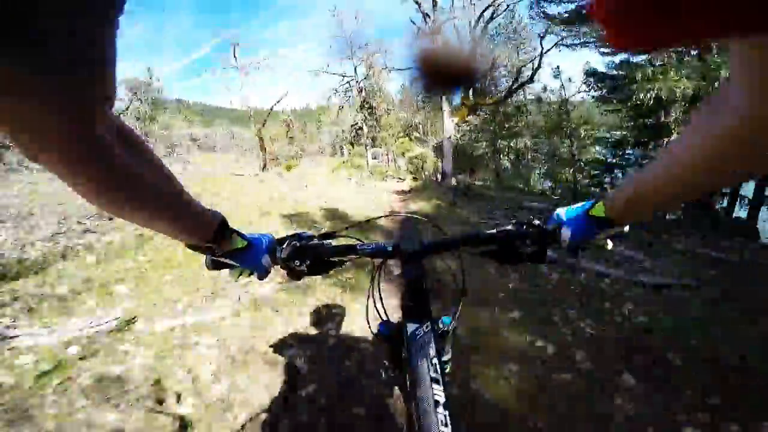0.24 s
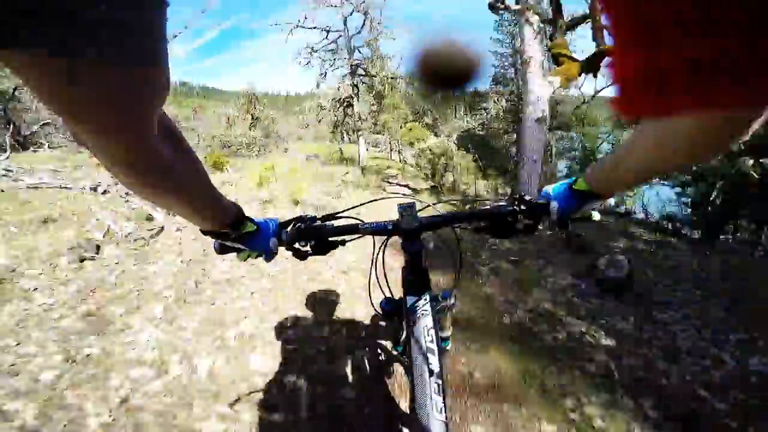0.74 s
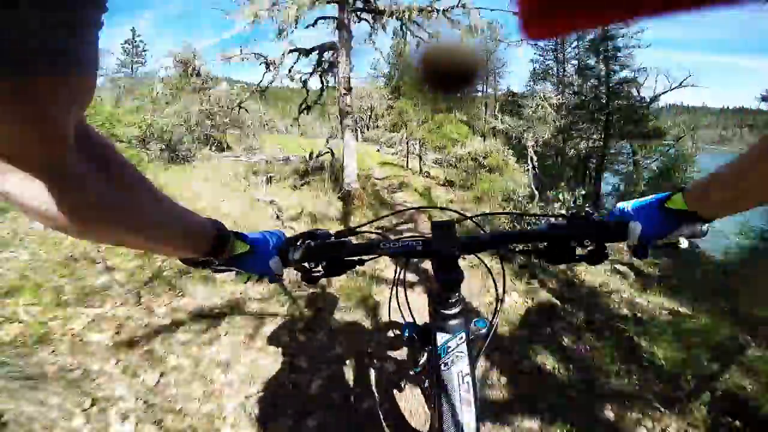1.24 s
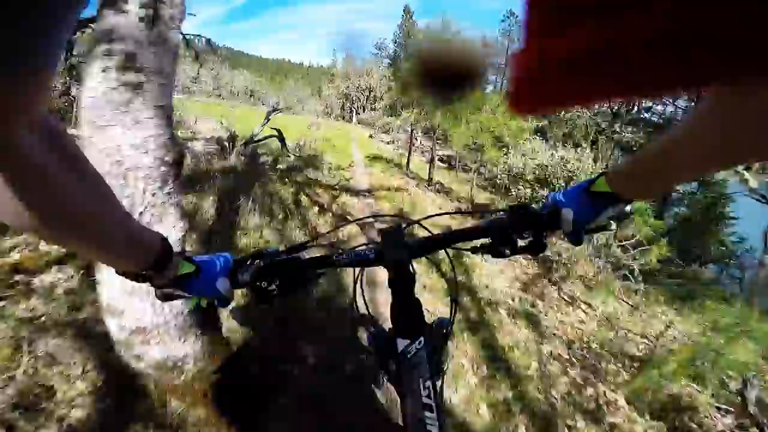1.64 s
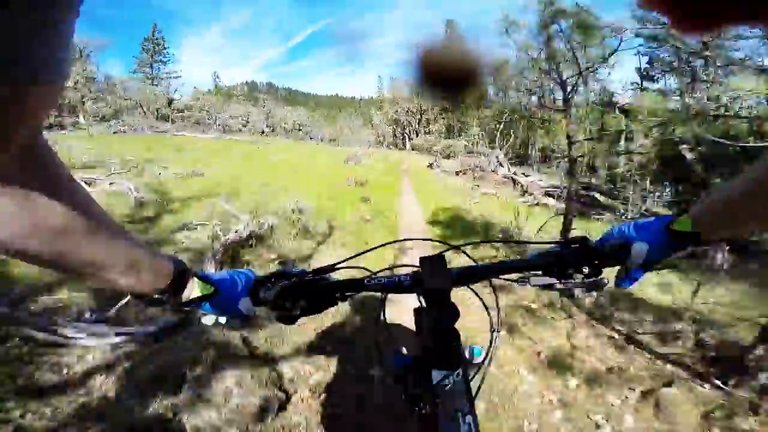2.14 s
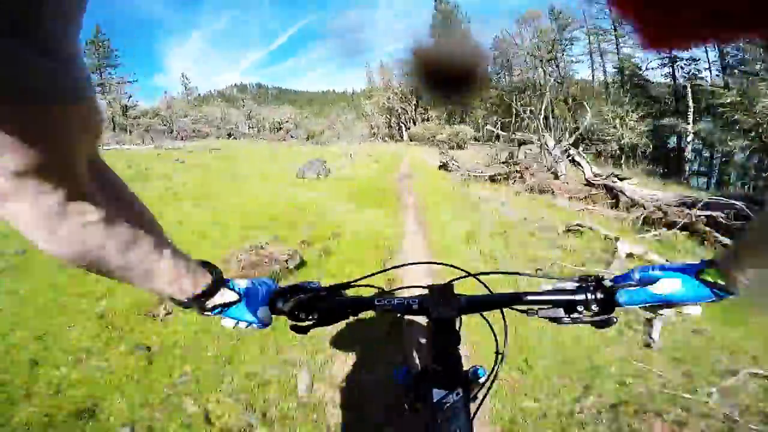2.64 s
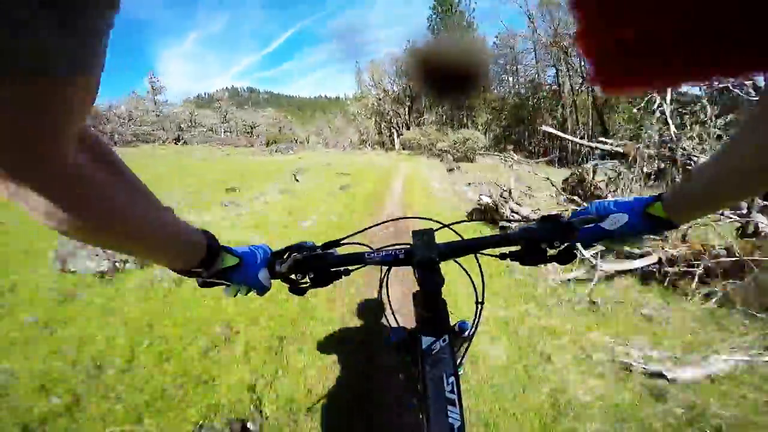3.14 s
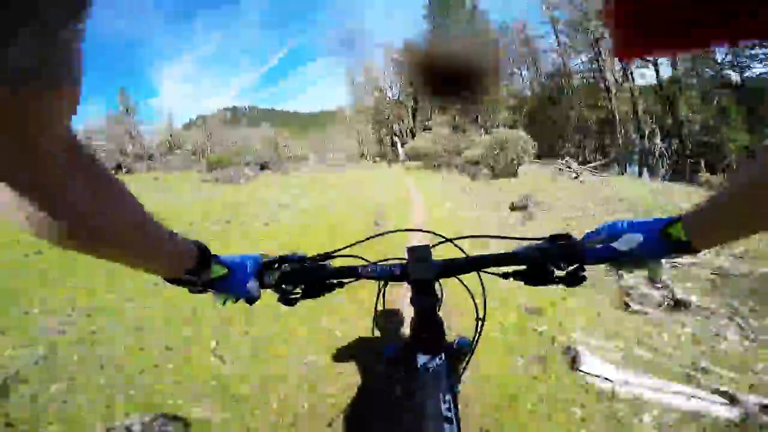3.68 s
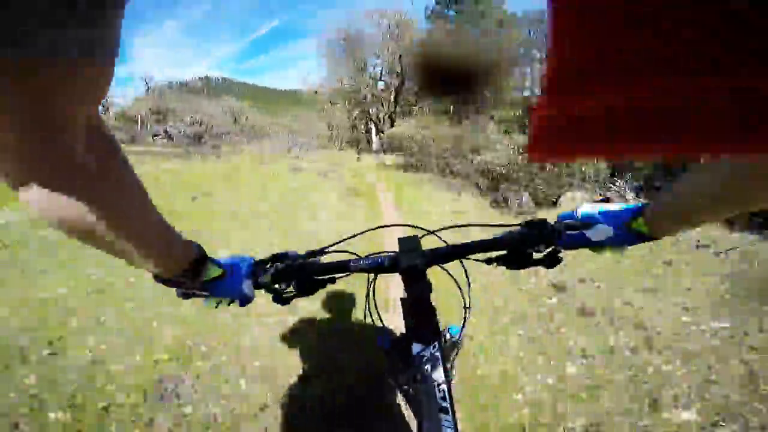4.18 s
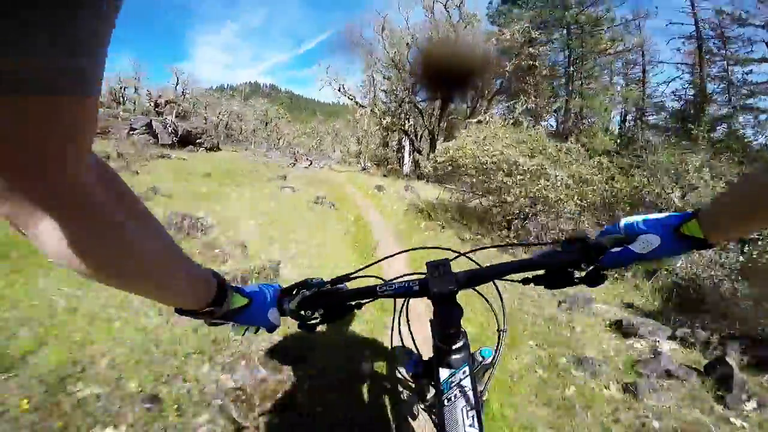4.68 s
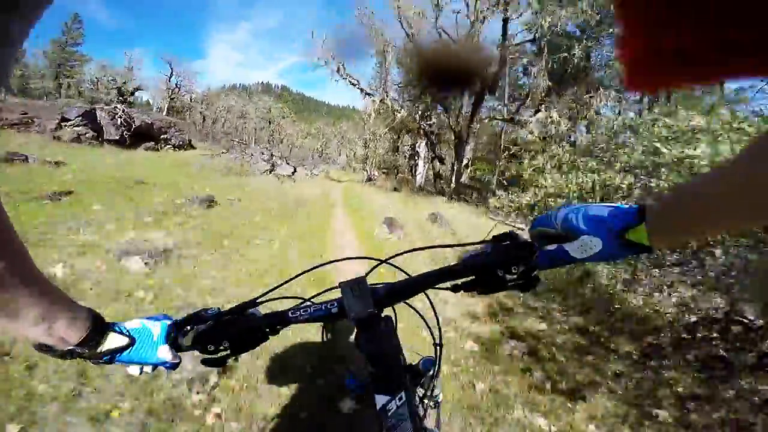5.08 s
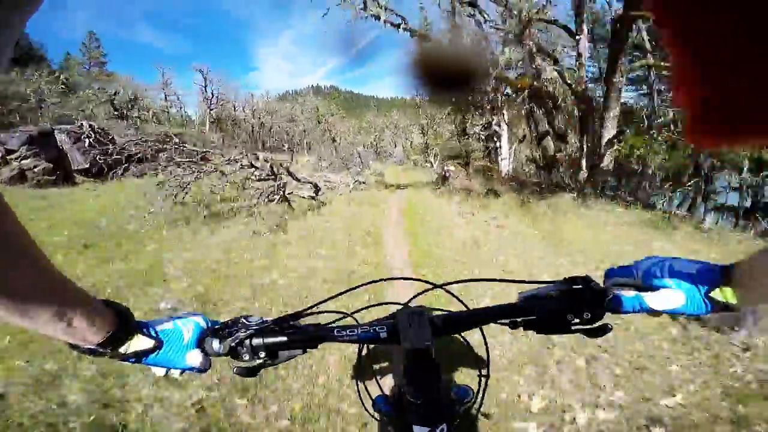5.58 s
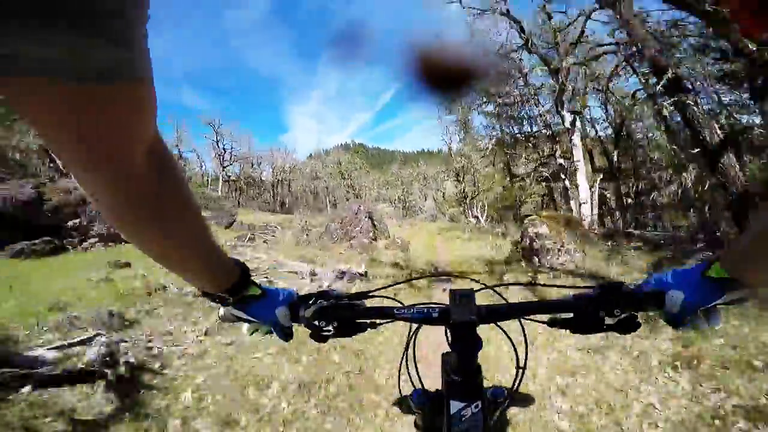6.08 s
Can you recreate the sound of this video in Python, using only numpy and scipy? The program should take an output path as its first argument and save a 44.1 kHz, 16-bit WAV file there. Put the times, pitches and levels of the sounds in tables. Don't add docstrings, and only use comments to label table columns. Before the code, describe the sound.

A mountain bike rushes over dry leaves and twigs, plastic camera mount knocking hard, wind buffeting the case, then smoother rolling with light taps.

```python
import sys
import numpy as np
from scipy import signal
from scipy.fft import rfft, irfft
from scipy.io import wavfile
from scipy.ndimage import uniform_filter1d

SR = 44100
rng = np.random.default_rng(int(sys.argv[2]) if len(sys.argv) > 2 else 0)


def output_pcm(signal):
    pcm = np.clip(np.atleast_2d(signal).T, -1, 1) * 32767
    wavfile.write(sys.argv[1], SR, np.round(pcm).astype(np.int16))


def gain_from_db(level_db):
    decades = np.asarray(level_db, float) / 20
    return 10 ** decades


N = 278712
T = np.arange(N) / SR

# frequency [Hz], density [dB per Hz].
GROUND_COLOUR = [(88, -14.5), (150, -17.5), (205, -5), (244, -0.5), (524, 0), (837, -11), (960, -7.5),
                 (1360, -14), (2270, -9), (3840, -8), (5050, -23), (6020, -22), (8560, -32), (15200, -32),
                 (15550, -57.5)]
# frequency [Hz], width [Hz], lift [dB].
CASE_MODES = [(330, 111, 6), (979, 42, 2.5), (1750, 36.6, -18), (2280, 70.6, 5.5), (3157, 364, -0.5),
              (3973, 94.4, -4), (4610, 93, 8), (6100, 910, 2), (7198, 210, 8), (9726, 277, 7.5)]
# frequency [Hz], level [dB].
WHINE_TONES = [(12618, -81)]
# time [s], level [dB].
WIND_LEVEL = [(0, -41.5), (.3, -27.5), (.7, -22.5), (1.5, -24), (2.2, -27), (2.65, -29), (3.1, -34.5),
              (3.5, -41.5), (4, -30.5), (4.6, -36), (5.05, -37), (5.35, -34), (5.9, -36), (6.32, -32.5)]
# start [s], hold [s], level [dB], edge [s].
WALL_HEAVES = [(0, 0.013, -23, 0.0098), (0.146, 0.043, -21.5, 0.0326), (0.419, 0.067, -21.5, 0.041),
               (0.932, 0.0127, -22, 0.0205), (1.104, 0.195, -17.5, 0.031), (1.668, 0.0157, -17.5, 0.047),
               (1.896, 0.0212, -16.5, 0.0141), (2.067, 0.036, -24.5, 0.0215), (2.727, 0.1725, -13, 0.0043),
               (2.966, 0.0116, -28, 0.05), (3.228, 0.0207, -26, 0.0226), (3.576, 0.0112, -24.5, 0.0198),
               (3.753, .02, -32.5, 0.029), (4.107, 0.0133, -22, 0.0175), (4.355, 0.025, -26.5, 0.0262),
               (4.57, 0.0204, -34, 0.0215), (4.759, 0.185, -24, 0.034), (5.166, 0.035, -22.5, 0.0314),
               (5.579, 0.0234, -31, 0.019), (6.021, 0.0071, -28, 0.0244), (6.312, .02, -30.5, 0.064)]
# time [s], level [dB].
WIND_PUFFS = [(0, -26), (.14, -37), (.35, -39.5), (.54, -37), (.9, -49.5), (1.04, -47.5), (1.32, -32.5),
              (1.99, -45.5), (2.69, -42.5), (2.85, -27.5), (2.94, -33), (3.24, -41.5), (3.41, -37),
              (3.55, -33), (3.75, -34.5), (4.49, -33), (4.79, -42), (5.56, -51), (5.93, -33.5),
              (6.3, -45.5)]
# time [s], peak [dB], pitch [Hz].
ROOT_JOLTS = [(0.117, -15, 57.6), (0.341, -19.5, 65.4), (.495, -15, 68.6), (.885, -15, 62),
              (1.659, -16, 72.4), (2.728, -14.5, 77.6), (2.844, -15.5, 80), (3.58, -18, 54.7),
              (3.992, -22, 69.3), (4.769, -20, 81.8), (5.169, -22, 69.9)]
# time [s], level [dB].
ROUGHNESS = [(0, 5), (.19, 1), (.46, 4.5), (.65, -0.5), (1.05, -0.5), (1.28, 2.5), (1.6, 1), (2.08, 0.5),
             (3.08, 1.5), (3.3, -4.5), (3.64, -2.5), (4.1, -2), (4.7, 0), (4.96, -3.5), (5.54, -6),
             (5.8, -4.5), (6.16, -2), (6.32, -5.5)]
# time [s], level [dB].
LITTER_DEPTH = [(0, -1), (.19, 0.5), (.46, 3), (.63, -1.5), (1.05, 2.5), (1.28, 4.5), (1.51, 0), (2.53, 4),
                (3.27, 2), (3.52, -1), (3.64, 2.5), (4.1, -3), (4.7, 0), (4.96, -7), (5.54, -7.5),
                (5.72, 1.5), (5.88, 2.5), (6.32, -2.5)]
# start [s], end [s], lift [dB].
LEAF_DRIFTS = [(4.284, 4.448, 3.5), (4.696, 4.814, 6.5), (0.173, 0.352, 2.5), (0.73, .82, 0),
               (5.44, 5.6, 3.5), (5.615, 5.7, 2.5), (.66, 0.677, 1.5), (2, 2.1, 3.5), (2.36, 2.56, 1.5),
               (2.7, 2.9, 1.5), (1.274, 1.252, 1), (5.93, 6.09, 0)]
# start [s], end [s], lift [dB].
STRAW_PATCHES = [(1.18, 1.68, 3.5), (2.75, 2.95, 2.5), (3.2, 3.75, 3.5), (4.85, 5.4, 3.5)]
# time [s], peak [dB], pitch
# [Hz].
GRIT_TICKS = [(.0797, -53, 5670), (.1416, -39, 5690), (.2034, -43, 5510), (.3097, -42, 6220),
              (.5678, -22, 5550), (.5855, -50, 6000), (1.2371, -46, 5200), (1.283, -49.5, 5240),
              (1.4222, -43, 5600), (1.4511, -39.5, 5590), (1.5968, -41, 5900), (1.6332, -41, 6000),
              (1.9021, -43, 5860), (4.735, -35, 6000), (4.755, -39, 5980), (0.288, -37.5, 5800),
              (0.5062, -39, 5860), (0.6175, -43, 5880), (1.3049, -40.5, 5950), (1.3503, -38.5, 5970),
              (1.3768, -44.5, 6100), (1.399, -41, 6000), (1.8781, -38.5, 6380), (2.5002, -49, 5500),
              (2.6893, -40.5, 5950)]
# time [s], peak [dB], pitch [Hz].
STRAW_SIZZLES = [(1.6267, -45, 9570), (2.6409, -33.5, 11450), (2.8938, -51, 8500), (2.913, -44.5, 9600),
                 (2.9662, -43.5, 8250), (3.0649, -38, 9140), (4.593, -47.5, 8020), (.568, -34.5, 13040),
                 (.576, -47.5, 8600), (4.478, -51.5, 12000), (.62, -55.5, 11500)]
# start [s], length [s], level [dB].
STALK_SCRAPES = [(4.732, 0.0066, -39), (4.7532, 0.0044, -40)]
# time [s], low ring [dB], high ring [dB].
METAL_RINGS = [(0.57, -30, -44), (0.823, -30.5, -38), (1.025, -36, -46.5), (1.138, -31, -54.5),
               (2.286, -39.5, -31), (2.737, -37, -34.5), (2.877, -41, -37), (2.929, -44, -50),
               (3.533, -41.5, -40), (5.889, -44, -52), (6.187, -42, -46.5)]
# frequency [Hz], split of the pair [Hz], T60 [s].
METAL_MODES = [
    (1808, 15, .19),
    (2654, 22, .13),
]
# time [s], peak [dB], pitch [Hz].
DEEP_THUDS = [(.568, -22, 381), (0.819, -20.5, 317.5), (2.007, -29, 330), (2.727, -25.5, 313),
              (2.86, -13.5, 268), (2.875, -24.5, 317), (3.5317, -32, 394), (4.113, -32.5, 276),
              (2.2866, -54.5, 344), (5.891, -32.5, 330), (6.188, -33.5, 294), (2.979, -29.5, 196)]
# time [s], peak [dB], pitch [Hz], hollow [dB], crack [dB].
MOUNT_KNOCKS = [(0.0328, -17, 2038, -1.5, -14), (0.5682, -3.5, 2059, -3, -24),
                (0.8175, -6, 2052, -4, -27.5), (0.8927, -16, 2025, -2, -19.5),
                (1.02, -15.5, 2290, -4.5, -18.5), (1.1389, 1.5, 2280, -12.5, -30.5),
                (2.0057, -24, 2250, 5, -12.5), (2.2862, -4, 2260, -11.5, -37),
                (2.4254, -13.5, 2092, -5, -15), (2.5689, -20, 2280, 1.5, -10.5),
                (2.7272, -9.5, 2192, -12, -27.5), (2.7357, -8.5, 2336, -6.5, -34.5),
                (2.86, -10, 2270, -1, -16.5), (2.875, -25.5, 2090, 12.5, -6.5),
                (2.876, -9.5, 2810, -28, -15.5), (3.5323, -10.5, 2204, -10.5, -43),
                (4.1124, -34, 2660, -14.5, -19), (4.1649, -19.5, 2167, -21.5, -43),
                (4.4934, -21, 1994, -7, -27), (4.748, -26.5, 2330, -24, -36),
                (5.8299, -18, 2356, -24.5, -35), (5.8895, -11, 2236, -8.5, -46.5),
                (6.1873, -12, 2217, -6.5, -40)]
# time [s], peak [dB], pitch [Hz].
MOUNT_BOUNCES = [(0.0358, -15.5, 2120), (0.0442, -24.5, 2310), (.5698, -13, 2175), (0.5728, -21, 2720),
                 (0.5762, -17.5, 1990), (0.8207, -8.5, 2239), (0.8253, -16, 2240), (1.024, -11.5, 1997),
                 (1.0297, -32.5, 2250), (1.1434, -5.5, 2317), (2.2904, -8.5, 2810), (2.2944, -40.5, 2720),
                 (2.4275, -23.5, 2310), (2.4308, -18.5, 2580), (2.572, -31.5, 1750), (2.7307, -11.5, 2280),
                 (2.742, -31.5, 2620), (2.8646, -20.5, 2105), (2.8827, -19, 2340), (2.891, -23.5, 2610),
                 (2.8953, -17.5, 2420), (3.536, -36.5, 2680), (3.5441, -26.5, 2690), (4.1159, -27.5, 2280),
                 (4.168, -26.5, 2204), (4.1725, -36, 2280), (5.8926, -40, 2130), (6.1913, -42, 1840)]
# time [s], peak [dB], pitch [Hz], hollow [dB].
WALL_BUMPS = [(0.6539, -25.5, 2120, 4), (0.6564, -37, 2064, 21), (1.679, -35, 1920, 11.5),
              (1.9528, -29.5, 1965, 10), (2.9281, -19, 2510, 7), (2.9315, -33, 1600, 4.5),
              (2.9786, -23, 2433, 11), (2.9801, -23.5, 1942, 10), (2.9835, -36.5, 1480, 12),
              (2.865, -22.5, 1910, 11), (4.494, -35.5, 1205, 7), (5.037, -41.5, 1230, 12.5),
              (5.5235, -41.5, 1810, 7), (4.08, -36, 1193, 7.5), (5.0349, -39.5, 1713, 13.5),
              (5.2092, -32, 1750, 12.5), (5.2105, -34.5, 2310, 14)]
# time [s], peak [dB], pitch [Hz].
MOUNT_TAPS = [(.3097, -30.5, 2280), (0.447, -27.5, 2560), (1.4225, -30.5, 2250), (1.5303, -36, 2230),
              (1.9031, -30, 1885), (2.6838, -26, 2330), (3.029, -40.5, 2300), (3.3988, -41.5, 2470),
              (3.4451, -32.5, 2750), (4.0662, -47.5, 2110), (4.542, -43.5, 2270), (4.575, -35, 2370),
              (4.7024, -34, 2310), (4.7341, -30, 2250), (4.9541, -41, 2280), (2.501, -33, 1750),
              (1.799, -33.5, 1620), (1.844, -28.5, 1610), (0.1635, -23.5, 2280), (0.4142, -27.5, 2320),
              (2.0145, -23, 2610), (2.0184, -22.5, 2390), (2.1578, -24, 1750), (2.1693, -26, 1970),
              (2.9157, -24, 2210), (3.5283, -29.5, 2180), (3.9712, -32.5, 2490), (4.4442, -29.5, 2670),
              (4.5935, -27.5, 2153), (4.7638, -25, 2070), (4.7945, -30.5, 2550), (5.1409, -30, 1970),
              (5.2011, -32.5, 2000), (5.2282, -28, 1810), (5.2926, -32, 2166), (5.5895, -32, 2310),
              (5.7334, -28.5, 2410), (5.7482, -28, 2810), (5.9133, -26.5, 2730), (5.966, -25.5, 2270),
              (6.0728, -33, 2850), (6.2697, -29.5, 2170)]
# time [s], peak [dB].
TWIG_SNAPS = [(0.989, -24.5), (0.145, -30), (1.053, -31.5), (1.2369, -26.5), (1.6901, -36), (2.4036, -27),
              (3.0677, -32.5), (5.345, -37.5), (5.8292, -27.5), (1.091, -35.5), (1.134, -25), (2.9142, -29),
              (5.4656, -38), (5.622, -35), (5.6917, -30), (5.8555, -30.5), (6.0217, -34), (6.0436, -31),
              (1.179, -24.5), (1.757, -23), (1.86, -28.5), (4.3, -41), (4.8003, -29), (5.0599, -29.5),
              (5.4733, -40.5), (5.5214, -24), (5.5243, -27.5), (5.5618, -28.5), (5.6756, -41.5),
              (5.7239, -24), (5.7308, -40), (5.7885, -27.5), (5.9932, -28.5), (6.2121, -30)]


def level(x):
    return x / np.sqrt(np.mean(x ** 2))


def band(x, lo_hz, hi_hz, order=2):
    edges = [lo_hz, min(hi_hz, .45 * SR)]
    return signal.sosfilt(signal.butter(order, edges, "bandpass", fs=SR, output="sos"), x)


def noise(n=N):
    return rng.standard_normal(n)


def walk(rate):
    k = int(SR / rate)
    held = np.repeat(noise(N // k + 1), k)
    return 1.9 * uniform_filter1d(uniform_filter1d(held, k), k)[:N]


def curve(table):
    return np.interp(T, *np.transpose(table))


def lump(s, hold, db, edge):
    outside = np.maximum(s - T, T - s - abs(hold))
    return gain_from_db(db) * np.exp(-np.maximum(outside, 0) / max(edge, .005))


def lifts(table):
    return uniform_filter1d(sum(db * ((T > a) & (T < b)) for a, b, db in table), size=700)


def ring(t, hz, t60, phase=0.):
    return np.sin(2 * np.pi * hz * t + phase) * np.exp(-np.log(1000) * t / t60)


def onset(t, tau):
    return 1 - np.exp(-t / tau)


def add(out, s, sound):
    i = int(s * SR)
    out[i:i + len(sound)] += sound[:max(N - i, 0)]


def colour(x):
    hz = np.linspace(1, SR / 2, 1025)
    ground_hz, ground_db = np.transpose(GROUND_COLOUR)
    db = np.interp(np.log(hz), np.log(ground_hz), ground_db)
    db = db + sum(lift / (1 + (2 * (hz - f) / w) ** 2) for f, w, lift in CASE_MODES)
    cepstrum = irfft(np.log(gain_from_db(db)))
    cepstrum[1:1024] *= 2
    cepstrum[1025:] = 0
    response = irfft(np.exp(rfft(cepstrum)))
    return signal.fftconvolve(x, response)[:N]


def electronic_whine():
    return sum(gain_from_db(db) * np.sin(2 * np.pi * hz * T + 1.5 * walk(9)) for hz, db in WHINE_TONES)


def capsule_hiss():
    hiss = band(colour(noise()), 7560, 14100, order=3) * gain_from_db(0.69 * walk(19))
    return gain_from_db(-71) * level(hiss)


def wind_on_case():
    wind = gain_from_db(curve(WIND_LEVEL))
    heave = wind + sum(lump(*h) for h in WALL_HEAVES)
    buffet_db, stiffening = -37.5, 0.118
    buffet = gain_from_db(buffet_db) * (wind / heave) ** stiffening
    buffet = buffet + sum(lump(s, 0, db, 0.0231) for s, db in WIND_PUFFS)
    slow = band(noise(), 9.24, 32.57, order=3)
    quick = band(noise(), 38.14, 107.0)
    slow = slow / (uniform_filter1d(slow ** 2, size=2600) + 1e-9) ** 0.248
    quick = quick / (uniform_filter1d(quick ** 2, size=2600) + 1e-9) ** 0.386
    return band(heave * level(slow) + buffet * level(quick) * gain_from_db(1.84 * walk(21)), 7.03, 260)


def jolts():
    out, t = np.zeros(N), np.arange(6000) / SR
    for s, db, hz in ROOT_JOLTS:
        sagging_hz = hz * (1 + .25 * np.exp(-t / .02))
        add(out, s - .012, gain_from_db(db + 5) * onset(t, .01) * ring(t, sagging_hz, .14))
    return out


def crackle(rate, scatter_db, hiss_db):
    chance = rng.random((3, N))
    size_db = -scatter_db * np.log(chance[2] + .01)
    clicks = (chance[0] < rate / SR) * np.sign(chance[1] - .5) * gain_from_db(size_db)
    smear = np.exp(-np.arange(120) / 22) * noise(120)
    smeared = np.convolve(clicks, level(smear))[:N]
    return level(smeared * 0.086 + clicks) + gain_from_db(hiss_db) * noise()


def grains(rate, scatter_db):
    out = np.zeros(N)
    for hz, width, _ in CASE_MODES[2:6]:
        chance = rng.random((2, N))
        size_db = -scatter_db * np.log(chance[1] + .01)
        crumbs = (chance[0] < rate / SR) * gain_from_db(size_db)
        out += band(crumbs, hz - 1.12 * width, hz + 0.46 * width) / np.sqrt(width)
    return level(band(out, 1300, 4600, order=4))


def tyres_on_litter():
    rough_db, litter_db, drift_db = curve(ROUGHNESS), curve(LITTER_DEPTH), lifts(LEAF_DRIFTS)
    hum = gain_from_db(-43.5 + rough_db)
    leaf = gain_from_db(-45 + litter_db + drift_db)
    rustle = gain_from_db(-62 + 0.914 * rough_db + 0.207 * litter_db + 0.4 * drift_db + lifts(STRAW_PATCHES))
    patch, tread, litter, straw = .6 * walk(24), .8 * walk(15), walk(50), 1.5 * walk(35)
    low = level(band(colour(crackle(900, 1.35, 0.49)), 103.6, 1625, order=3))
    rumble = band(low, 100, 430) * gain_from_db(-2 - 0.3 * rough_db + 0.6 * tread)
    low = band(low, 430, 2600) + rumble
    shared = crackle(1800, 3.0, 5)
    mid = level(band(colour(shared), 1450, 4900, order=3)) + .5 * grains(70, 3.0)
    high = band(colour(.6 * shared + crackle(500, 3.3, 4)), 4900, 15800, order=3)
    out = hum * low * gain_from_db(patch + tread)
    out = out + leaf * level(mid) * gain_from_db(patch + litter)
    return out + rustle * level(high) * gain_from_db(patch + straw)


def grit_ticks():
    out, t = np.zeros(N), np.arange(1200) / SR
    for table, lo_hz, fade in ((GRIT_TICKS, 4800, .005), (STRAW_SIZZLES, 7500, .004)):
        for s, db, hz in table:
            grit = noise(len(t))
            fizz = 0.524 * band(grit, lo_hz, 12100) + 2.77 * band(grit, 1.096 * hz, 1.097 * hz)
            add(out, s - .0005, gain_from_db(db) * fizz * onset(t, 0.00044) * np.exp(-t / fade))
    return out


def stalk_scrapes():
    out, t = np.zeros(N), np.arange(1200) / SR
    for s, length, db in STALK_SCRAPES:
        grit = noise(len(t))
        fizz = 0.74 * band(grit, 7700, 15500) + 2.13 * band(grit, 11420, 13380)
        release = np.exp(-np.maximum(t - length, 0) / 0.00153)
        add(out, s, gain_from_db(db) * fizz * onset(t, 0.00067) * release)
    return out


def metal_rings():
    out, t = np.zeros(N), np.arange(12000) / SR
    for s, *dbs in METAL_RINGS:
        for (hz, split, t60), db in zip(METAL_MODES, dbs):
            upper = ring(t, hz + split / 2, t60)
            lower = ring(t, hz - split / 2, 1.515 * t60)
            add(out, s, gain_from_db(db) * (upper - 1.05 * lower))
    return out


def thuds():
    out, t = np.zeros(N), np.arange(1400) / SR
    for s, db, hz in DEEP_THUDS:
        modes = ring(t, hz, 0.0144) - .5 * ring(t, 2.478 * hz, 0.018)
        add(out, s, -gain_from_db(db + 7.5) * onset(t, 0.000216) * modes)
    return band(out, 48, 16100)


def blows():
    hard = list(MOUNT_KNOCKS)
    for s, db, hz in MOUNT_BOUNCES:
        *_, hollow_db, crack_db = [k for k in MOUNT_KNOCKS if k[0] < s][-1]
        hard.append((s, db, hz, hollow_db - 2, crack_db - 4.5))
    rows = []
    for s, db, hz, hollow_db, crack_db in hard:
        bright_db = -7 + 0.343 * crack_db - 0.138 * db
        rows.append((s, db, hz, hollow_db, bright_db, crack_db))
    rows += [(*bump, -17, -30) for bump in WALL_BUMPS]
    rows += [(*tap, -12.5, -6.5, -28) for tap in MOUNT_TAPS]
    return rows + [(*snap, 3392, -19, -5, -23) for snap in TWIG_SNAPS]


def knocks():
    out, t = np.zeros(N), np.arange(1400) / SR
    rows = blows()
    chance = np.clip(rng.standard_normal((len(rows), 4)), -2, 2)
    push = onset(t, 0.000216)
    for (s, db, hz, hollow_db, bright_db, crack_db), c in zip(rows, chance):
        grit = noise(len(t))
        shell = ring(t, hz, 0.00768) + 0.278 * ring(t, 1.22 * hz * (1 + 0.0607 * c[0]), 0.01167, c[1])
        hollow = ring(t, hz / 2, 0.00803)
        hollow = hollow - 0.314 * ring(t, 0.295 * hz, 0.01352) - 0.586 * ring(t, 0.632 * hz, 0.00446)
        bright = ring(t, 3750 * (1 + 0.033 * c[2]), 0.00788)
        crack_fade = np.exp(-t / 0.00085) + 0.075 * np.exp(-t / 0.0016)
        crack = 1.214 * band(grit, 5200, 10450, order=1) * crack_fade
        crack = crack + .55 * ring(t, 5550 * (1 + 0.04 * c[3]), 0.008)
        light = db < -24
        touch = push ** 3 if light else push
        chatter = 0.385 * band(grit, 291, 2140) * np.exp(-t / 0.00343)
        crunch = 0.567 * push * band(grit, 0.771 * hz, 4110, order=4) * np.exp(-t / 0.00833)
        chatter = chatter + light * crunch
        blow = shell + chatter - gain_from_db(hollow_db) * hollow + gain_from_db(bright_db) * bright
        add(out, s, gain_from_db(db + 4.5) * (touch * blow + gain_from_db(crack_db) * crack))
    return band(out, 48, 16100)


def scene():
    background = electronic_whine() + capsule_hiss() + wind_on_case() + jolts()
    ground = tyres_on_litter() + grit_ticks() + stalk_scrapes()
    return (background + ground + metal_rings() + thuds() + knocks())[None]


def low_pass(x):
    return signal.sosfilt(signal.butter(12, 16470, fs=SR, output="sos"), x)


def record(dry):
    rounded = np.tanh(0.8105 * dry) / 0.839
    top_cut = signal.butter(8, 15200, fs=SR, output="sos")
    finished = signal.sosfilt(top_cut, rounded)
    return low_pass(finished)


dry = scene()
out = record(dry)
output_pcm(out)
```